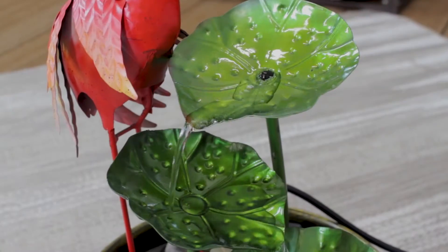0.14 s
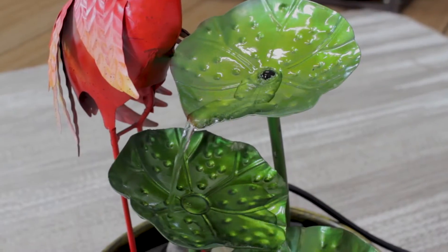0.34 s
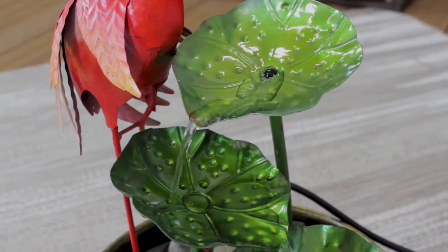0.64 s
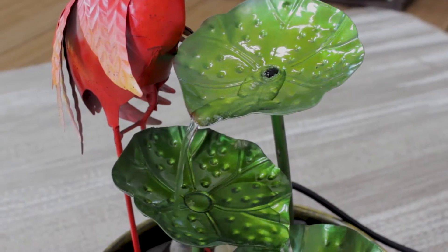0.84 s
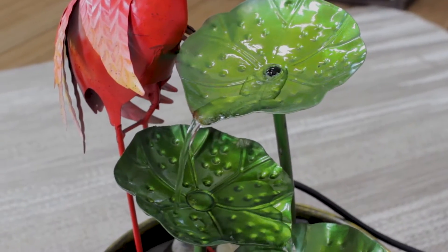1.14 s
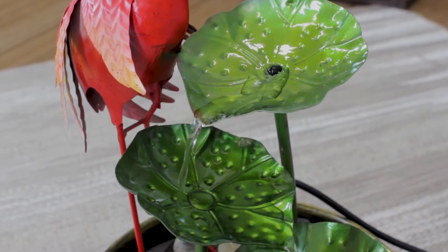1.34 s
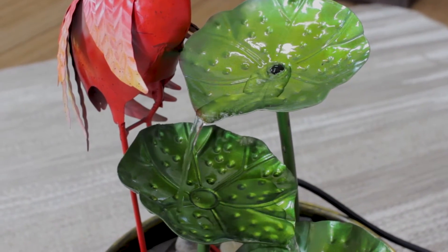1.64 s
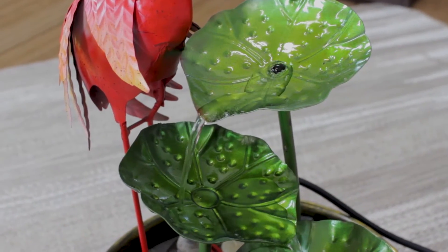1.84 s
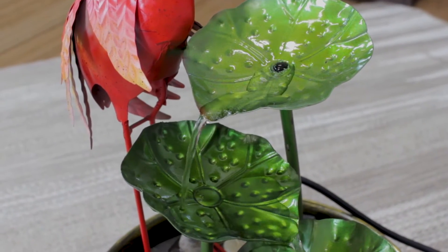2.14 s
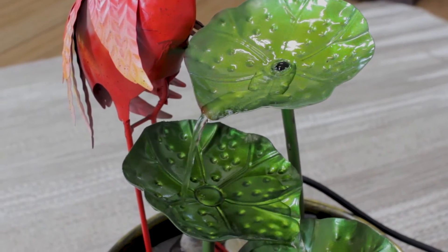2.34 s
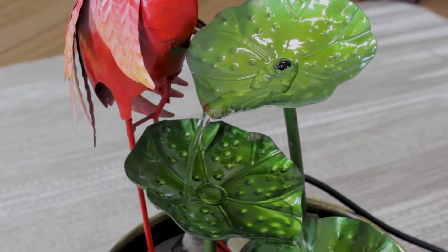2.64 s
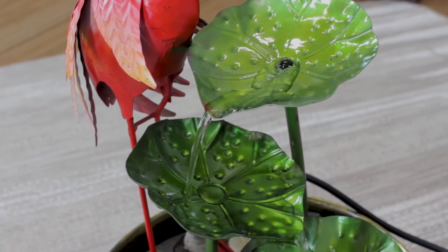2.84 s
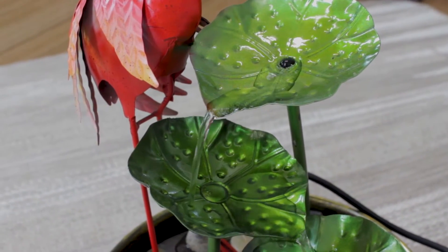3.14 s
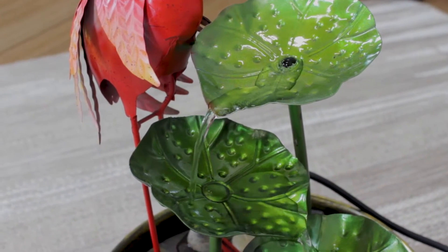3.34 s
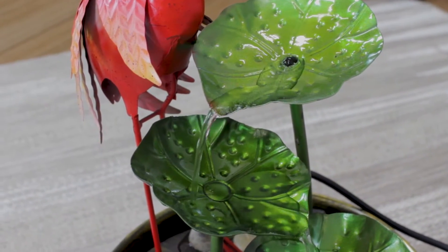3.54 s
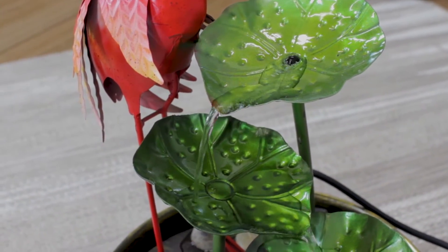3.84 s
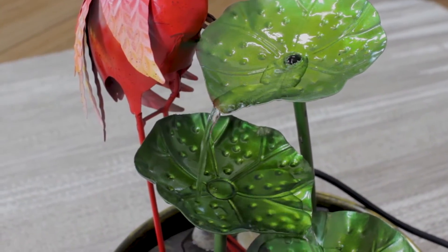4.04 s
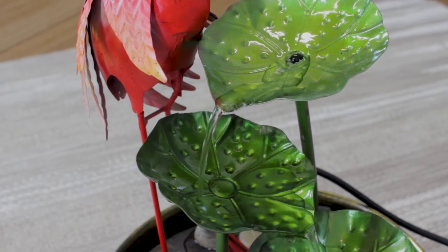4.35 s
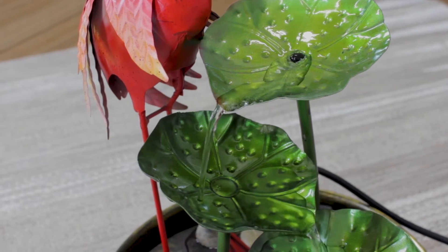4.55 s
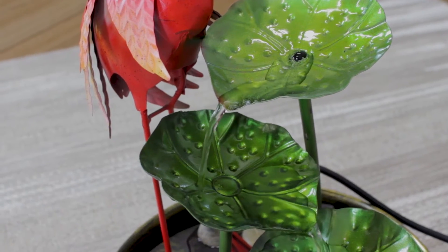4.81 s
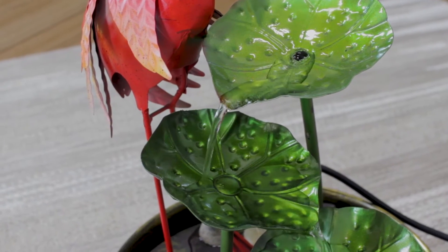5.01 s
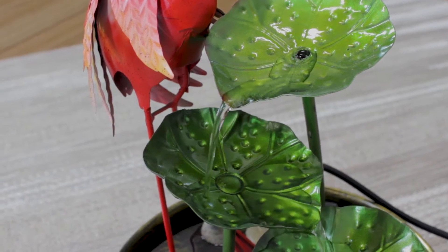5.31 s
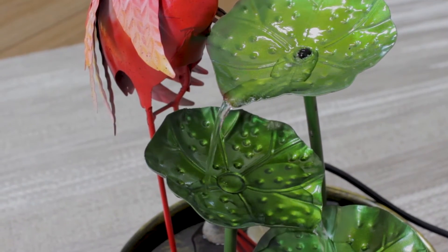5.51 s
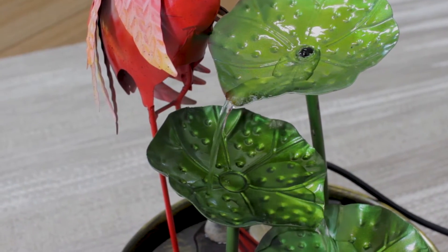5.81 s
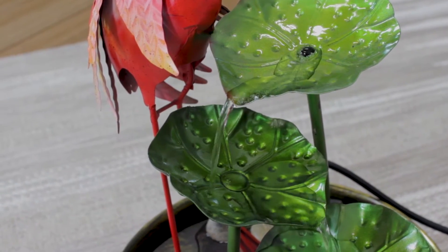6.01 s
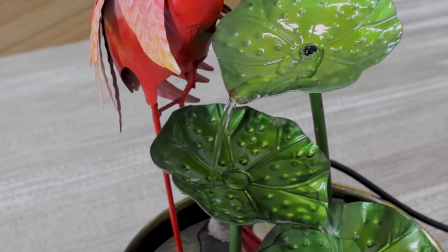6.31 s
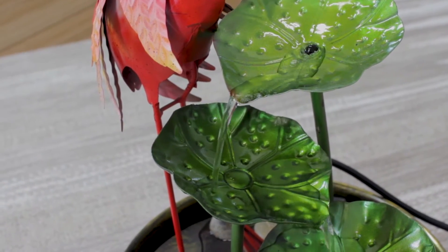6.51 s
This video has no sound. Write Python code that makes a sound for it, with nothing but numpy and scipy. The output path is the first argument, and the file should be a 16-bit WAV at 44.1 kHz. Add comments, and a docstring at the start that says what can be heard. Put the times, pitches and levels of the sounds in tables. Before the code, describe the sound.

A small tabletop fountain trickles steadily over metal leaves into a basin, dotted with quick, bright plinks of drops.

```python
"""A small tabletop fountain runs in a quiet room, heard from close by.
A thin stream slides over metal leaves and patters into the basin, whose hollow colours it.
Larger drops plink: each traps a bubble that pings for a few cycles and sets the basin ringing."""
import sys
import numpy as np
from scipy import signal
from scipy.io import wavfile

SR = 44100
rng = np.random.default_rng(int(sys.argv[2]) if len(sys.argv) > 2 else 0)


def master_out(mix):
    """Clip the mix to full scale and print it as 16-bit PCM to the path in sys.argv[1]."""
    frames = np.transpose(np.atleast_2d(mix))
    ceiling = np.clip(frames, -1, 1)
    pcm = np.round(ceiling * 32767).astype(np.int16)
    wavfile.write(sys.argv[1], SR, pcm)


N = 294147

# drops: (s, ping rms dB over 10 ms, bubble Hz, basin ring rms dB over 20 ms, left-right dB)
DROPS = [(0.0527, -44, 1380.0, -44.0, 0), (0.0545, -35, 9050, -51, 4.5),
         (0.1596, -48, 1380, -33, 2.0), (0.2333, -25, 6870, -37.5, 1),
         (0.3532, -23.5, 4440, -27, -2), (0.3545, -44, 7500, -46, 1.0),
         (0.3943, -40.0, 1390, -35, -8), (0.4905, -48, 1270, -38, -5),
         (0.5317, -26.5, 7700, -34.5, 1), (0.533, -33.0, 6300.0, -50.0, -7),
         (0.559, -36.5, 6800, -42.5, 1), (0.708, -42, 9400, -44, 5),
         (0.7715, -32.5, 4440, -43.5, -1.0), (0.8264, -30, 6500, -35.5, 0.0),
         (0.8735, -56, 1400, -34.5, 1.0), (0.9154, -31.5, 1160, -61, -1.0),
         (0.9148, -36, 2700, -48, -4), (1.0303, -28.5, 9100, -39, 1.0),
         (1.1041, -37, 12300, -43, 4), (1.1922, -36.0, 10600, -41.5, -1.0),
         (1.3405, -39.5, 9560.0, -44, 3), (1.3823, -31.5, 3250, -34, -5),
         (1.476, -30.0, 9150, -35.5, 3.5), (1.5362, -28.5, 10100, -40, -1.0),
         (1.63, -34, 10400, -34, 6), (1.6723, -33.5, 9250, -42, 5),
         (1.8608, -44, 13140.0, -50, 3), (1.9283, -41, 12330.0, -64, 7),
         (2.0011, -26, 7300, -27, 1), (2.065, -27.5, 6030.0, -34.5, 0.0),
         (2.1351, -37, 11900, -44, 5.0), (2.2139, -30.5, 4950, -35, -2),
         (2.2617, -45.0, 1130, -43.5, -1.0), (2.3025, -57, 1190.0, -35, 1.0),
         (2.3154, -27.5, 6540, -42, 1.5), (2.3438, -30.0, 4750.0, -33.5, -1),
         (2.3954, -29.5, 11760.0, -40.5, 3.0), (2.4366, -29.5, 7200, -57, 1.0),
         (2.4725, -31.5, 5800, -43.5, -1), (2.505, -25.0, 8800, -36, 3.5),
         (2.5638, -28.5, 1150, -41, 1), (2.6288, -28, 8000, -52, 3),
         (2.684, -41.0, 12500.0, -63, 1.0), (2.7355, -36, 1460, -50, -2),
         (2.7575, -29.5, 1190.0, -37, 3), (2.7635, -36, 1530, -39, -5),
         (2.848, -42, 9700.0, -54.0, 1.0), (2.8855, -42, 3220, -33, -3),
         (2.8883, -28.5, 3200, -34.5, -4), (2.9016, -35, 7300, -65, 7),
         (2.9544, -34.5, 1340, -50, -2), (2.977, -42.0, 5000.0, -40, 0.0),
         (3.0317, -24.5, 5530, -32.5, -1), (3.171, -41.5, 5500.0, -52, -3),
         (3.206, -42, 14000.0, -52.0, 1.0), (3.2241, -36.0, 12130.0, -42.0, 2.0),
         (3.2714, -29, 3000, -40, -2.0), (3.3449, -48, 1530, -29.5, 0),
         (3.362, -34, 6540, -48.0, 1.0), (3.4111, -31.5, 12500, -38, 3.0),
         (3.4906, -25, 3700, -38, -2.0), (3.526, -32.0, 11000, -42.5, 1.0),
         (3.6115, -34, 7700, -41.5, 3), (3.6701, -25, 2060, -40, -2.0),
         (3.6755, -33, 1580, -63, 2), (3.764, -36.5, 10200, -65, -3.0),
         (3.8492, -40.5, 2800, -51, 0.0), (3.8495, -34.0, 1500, -54, -3),
         (4.085, -36.0, 1490.0, -48, 0.0), (4.112, -26, 4630, -49, -2),
         (4.1465, -27.0, 9260.0, -39, 4), (4.1753, -30.5, 5570.0, -43, 1),
         (4.248, -30.5, 9300, -38.5, 1), (4.2926, -32.5, 8500, -41, 1),
         (4.3302, -39, 12730.0, -42, 4), (4.3529, -31, 9600, -51, 4),
         (4.4158, -44, 1160, -34.5, 2.0), (4.4794, -24, 9200, -51.0, 0),
         (4.5025, -33, 7240, -58, 2.0), (4.5605, -29.5, 6330, -37, 2),
         (4.6113, -30.0, 5950, -40, 2), (4.7336, -37.5, 4600, -50, -2),
         (4.8633, -28, 4240, -64, -2.0), (4.9403, -42, 1390, -40, -4),
         (4.9938, -25, 8300, -43, 3.0), (5.2245, -23.5, 3750, -28.5, 0.0),
         (5.2245, -26.5, 5470, -43, -1), (5.363, -39.0, 9400.0, -60, -4),
         (5.3768, -31, 9700, -39, 4), (5.3795, -28.5, 1640, -37.5, -1),
         (5.4132, -32, 1180, -54, 0.0), (5.4135, -38, 4430, -59, -4),
         (5.563, -27, 7460, -39.0, 1.5), (5.5988, -29, 10600, -46.0, 1.0),
         (5.615, -38, 11000.0, -50, 1.0), (5.6274, -31.5, 9700, -52.0, 3.0),
         (5.6533, -43, 1400, -32.5, -10), (5.7434, -27.5, 6740.0, -38, 1.0),
         (5.777, -25.0, 4720, -39.5, -1), (5.894, -35.5, 1480, -34.5, -7),
         (5.9929, -35.5, 9720.0, -42, 1), (6.1091, -30.5, 3160, -43.5, -2),
         (6.1629, -32.5, 13500, -36, 4.0), (6.1954, -29.5, 4460, -30.5, -2),
         (6.2468, -36.5, 8500, -44, 5), (6.29, -25.5, 9800, -36, 3),
         (6.3276, -36, 2780, -54.0, -3), (6.3507, -48, 1480, -36.5, 1.0),
         (6.4017, -30.0, 1530, -42, -4), (6.5076, -32, 9540, -40, 6),
         (6.5992, -51, 1370, -32.5, -2)]
# resonances of the basin and leaves: (Hz, width Hz, dB under the stream, dB under a drop)
BASIN = [(447.5, 6.7, -10.5, -42), (493.5, 29.7, 0, -18), (609, 23, -10, -19.5), (734, 14, -0.5, -11.5), (918, 22.3, 3.5, 3.5), (950, 44, 3, -3),
         (1188, 108, -1.5, -13.5), (1352.6, 49, 4, -11), (1442, 37, -2, -4.5), (1497, 23, -11, -10), (1666, 22, -4.5, -5),
         (1786, 43, -15.5, -7.5), (2400, 62, -13.5, -17), (3094, 58, -5, -29), (3230, 30, -18, -37), (3700, 34, -11, -23)]
# wash of the running water: (Hz, dB per Hz)
WASH = [(250, -3.5), (380, -2.5), (650, 9.5), (1100, 11.5), (1700, -6.5), (2300, -15.5), (4000, -6), (7500, -1.5), (10000, -.5), (13000, -8), (16000, -4)]
# (Hz, left-right likeness)
LIKENESS = [(60, 0.55), (300, 0.62), (650, 0.85), (1400, 0.66), (3100, 0), (6800, 0), (15000, 0)]
CUTOFF_HZ = 15850   # fixed
# stillness of the room: (Hz, dB per Hz)
AIR = [(30, -1), (90, -3), (160, -1), (250, 10), (400, -12), (1000, -23)]
WASH_DB, STREAM_DB, SPRAY_DB, AIR_DB = -46, -40.5, -54.5, -75


def from_db(db):
    return 10 ** (np.asarray(db) / 20)


def rms_one(x):
    return x / np.sqrt(np.mean(x ** 2) + 1e-20)


def at_hz(points, hz):
    return np.interp(np.log(hz), np.log(np.array(points)[:, 0]), np.array(points)[:, 1])


def add(out, s, sound):
    """Mix a stereo sound in at time s."""
    i = int(np.clip(s * SR, 0, N - 1))
    out[:, i:i + sound.shape[1]] += sound[:, :N - i]


def drift(rate):
    """Slow chance of spread 1."""
    r = np.exp(-80 * np.pi * rate / SR)  # fixed
    slow = signal.lfilter([1], [1, -2 * r, r * r], rng.standard_normal(N // 40 + 2002))[2000:]  # fixed
    return np.interp(np.arange(N) / 40, np.arange(len(slow)), rms_one(slow))  # fixed


def resonate(x, hz, width_hz):
    """One resonance, gain 1 on top."""
    r = np.exp(-np.pi * width_hz / SR)
    return signal.lfilter(np.array([1, 0, -1]) * (1 - r * r) / 2, [1, -2 * r * np.cos(2 * np.pi * hz / SR), r * r], x + 1e-18)


def spread(mid, side, hz):
    """Two unrelated signals become left and right, alike in the bass only."""
    alike = np.clip(at_hz(LIKENESS, hz), -1, 1)
    return np.sqrt(1 + alike) * mid + np.sqrt(1 - alike) * np.array([side, -side])


def patter(per_s, size_db):
    """Random impacts, many small and a few large."""
    sizes = from_db(size_db * np.minimum(rng.exponential(1, N), 4))  # fixed
    return sizes * rng.choice([-1, 1], N) * (rng.random(N) < per_s / SR)


def stream(per_s, size_db, surge_db):
    """The falling thread of water drums steadily on the basin's resonances."""
    flow = from_db(surge_db * drift(9.6))
    impacts = np.array([patter(per_s, size_db), patter(per_s, size_db)]) * flow
    return rms_one(sum(from_db(level_db) * spread(*resonate(impacts, hz, width_hz), hz) for hz, width_hz, level_db, _ in BASIN))


def spray(per_s, size_db, low_hz, sharpness):
    """Tiny bubbles fizz at all treble pitches."""
    pitches, out = np.geomspace(low_hz, 14000, num=14), np.zeros((2, N))
    for hz in pitches:
        fizz = resonate(patter(per_s / len(pitches), size_db), hz, hz / sharpness) / np.sqrt(hz)
        out += scatter(fizz, echo_db=8.0, fade_s=0.0037)[:, :N]
    return rms_one(out)


def scatter(sound, echo_db, fade_s):
    """Leaves and basin wall throw a sound back within milliseconds, differently to each side."""
    t = np.arange(int(.03 * SR)) / SR  # fixed
    paths = rng.standard_normal((3, len(t))) * (rng.random((3, len(t))) < .25) * np.exp(-t / fade_s) * (t > .0003)
    paths = paths[:2] + 0.23 * paths[2]   # some paths reach both sides
    paths *= from_db(echo_db) / np.sqrt(np.sum(paths ** 2, axis=1, keepdims=True))
    paths[:, 0] = 1
    return signal.fftconvolve(paths, sound[None], axes=1)


def at_level(sound, level_db, span_s):
    """Give each channel the energy of level_db held for span_s."""
    return sound * from_db(level_db) * np.sqrt(span_s * SR / np.sum(sound ** 2, axis=-1, keepdims=True))


def pings(cycles, rise, splash, splash_s, snap, clean_hz, lag_s):
    """A drop lands with a snap; its bubble rings briefly, rising in pitch, inside a ragged splash."""
    out, t = np.zeros((2, N)), np.arange(int(.06 * SR)) / SR  # fixed
    for s, ping_db, hz, _, pan_db in DROPS:
        age = t * hz / cycles
        bubble = np.sin(2 * np.pi * hz * np.cumsum(1 + rise * (np.minimum(age, 1) - .1)) / SR) * from_db(-60 * age)  # fixed
        burst = band(rng.standard_normal(len(t)) * np.exp(-t / splash_s), 0.76 * hz, 1.41 * hz, order=2)
        crack = band(signal.unit_impulse(len(t)), 0.88 * hz, min(2.86 * hz, 13500), order=2)
        ragged = 1 / (1 + (clean_hz / hz) ** 2)   # big, low bubbles ring more purely
        drop = band(rms_one(bubble) + ragged * (splash * rms_one(burst) + snap * rms_one(crack)), 530, 10600, order=2)
        left, right = at_level(scatter(drop, echo_db=0.5, fade_s=.0032), ping_db, .01)  # fixed
        right = np.roll(right, round(rng.normal(0, abs(lag_s)) * SR))
        add(out, s, np.array([left, right]) * from_db([[pan_db / 2], [-pan_db / 2]]))
    return out


def basin(push_hz, push_width_hz, vary_db, side):
    """Each drop gives the basin a soft push; its modes answer with new strengths every time."""
    out, click = np.zeros((2, N)), signal.unit_impulse(int(.15 * SR))  # fixed
    push = resonate(click, push_hz, push_width_hz)
    for s, _, _, ring_db, _ in DROPS:
        ring = 0
        for hz, width_hz, _, level_db in BASIN:
            strength, lean, detune = rng.standard_normal(3)
            ring = ring + from_db(level_db + vary_db * strength) * resonate(push, hz * (1 + 0.0029 * detune), width_hz) * (1 + side * lean * np.array([[1], [-1]]))
        add(out, s, at_level(ring, ring_db, .02))  # fixed
    return out


def room(x, t60, dull_hz, gap_s):
    """A short diffuse tail from table and walls, different on each side."""
    t = np.arange(int(.5 * SR)) / SR  # fixed
    tail = rng.standard_normal((2, len(t))) * from_db(-60 * t / t60) * np.clip(t / gap_s - .5, 0, 1)
    tail /= np.sqrt(np.sum(tail ** 2, axis=1, keepdims=True))
    tail = signal.sosfilt(signal.butter(1, min(dull_hz, .45 * SR), fs=SR, output="sos"), tail)
    return signal.fftconvolve(x, tail, axes=1)[:, :N]


def band(x, low_hz, high_hz, order):
    """Keep what lies between two frequencies."""
    return signal.sosfilt(signal.butter(order, [low_hz, min(high_hz, .45 * SR)], "band", fs=SR, output="sos"), x + 1e-18)


def hiss(spectrum, patchy_db):
    """Stereo noise that flickers band by band."""
    span = spectrum[0][0], min(spectrum[-1][0], .4 * SR)
    out, together, edges = 0, drift(27), np.geomspace(*span, num=2 * len(spectrum))
    white = rng.standard_normal((2, 2, N))
    for k, (low, high) in enumerate(zip(edges, edges[1:])):
        hz = np.sqrt(low * high)
        gain = from_db(at_hz(spectrum, hz) + patchy_db * (0.45 * together + drift(28)))
        out = out + gain * spread(*band(white[k % 2], low, high, order=2), hz)
    return rms_one(out)


def ticks(contact_s, low_hz, high_hz, vary_db):
    """The first contact of a drop is a hard, wide tick, as strong as its push on the basin."""
    out, t = np.zeros((2, N)), np.arange(int(.005 * SR)) / SR  # fixed
    for s, _, _, ring_db, pan_db in DROPS:
        tick = band(rng.standard_normal(len(t)) * np.exp(-t / contact_s), low_hz, high_hz, order=1)
        level_db = ring_db + vary_db * rng.standard_normal()
        add(out, s, at_level(scatter(tick, echo_db=1.5, fade_s=.003), level_db, .02))  # fixed
    return out


def scene():
    """Drops and spray over the steady stream, in the room."""
    plinks = from_db(-1.06) * pings(cycles=34.4, rise=0.068, splash=0.95, splash_s=0.0023, snap=0.49, clean_hz=1400, lag_s=.00004)
    plinks = plinks + from_db(-13.0) * ticks(contact_s=0.00018, low_hz=1500, high_hz=8600, vary_db=3.0)
    plinks = plinks + from_db(SPRAY_DB) * spray(per_s=260, size_db=4.0, low_hz=4480, sharpness=15)
    rings = from_db(1.0) * basin(push_hz=1057, push_width_hz=423, vary_db=2.5, side=0.24)
    running = from_db(STREAM_DB) * stream(per_s=2600, size_db=2.5, surge_db=2.0) + from_db(WASH_DB) * hiss(WASH, patchy_db=2.14)
    wet = room(from_db(-8.5) * plinks + from_db(-13.5) * rings, t60=.21, dull_hz=9500, gap_s=0.004)
    # the water carries almost nothing below about 380 Hz
    water = signal.sosfilt(signal.butter(4, 380, "high", fs=SR, output="sos"), plinks + rings + running + wet)
    return water + from_db(AIR_DB) * hiss(AIR, patchy_db=3.5)


def record(dry):
    """The top is cut."""
    return signal.sosfilt(signal.ellip(10, .2, 70, CUTOFF_HZ, fs=SR, output="sos"), dry)


dry = scene()
out = record(dry)
master_out(out)
```